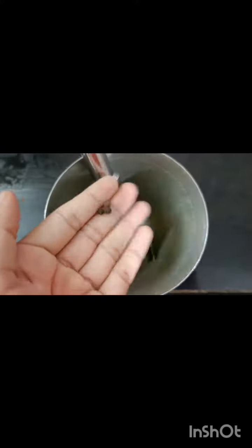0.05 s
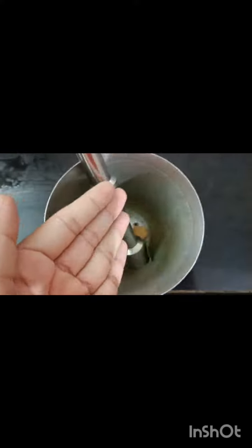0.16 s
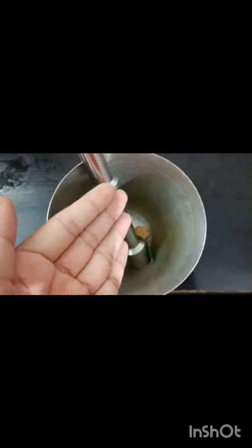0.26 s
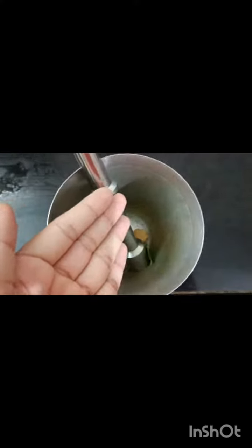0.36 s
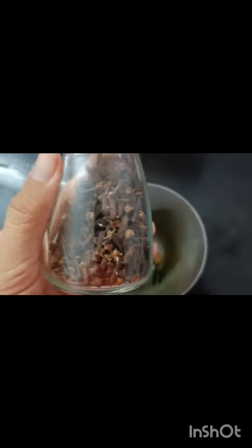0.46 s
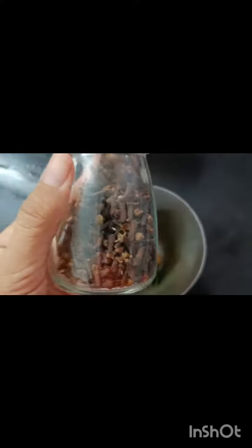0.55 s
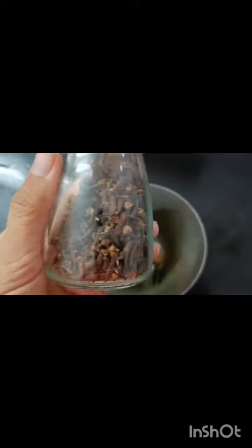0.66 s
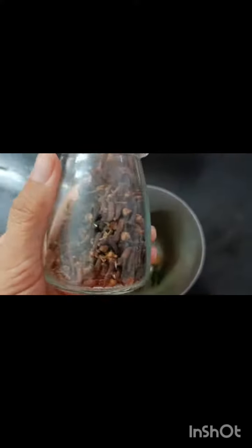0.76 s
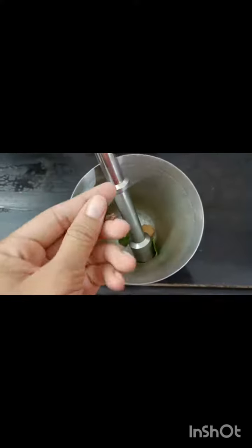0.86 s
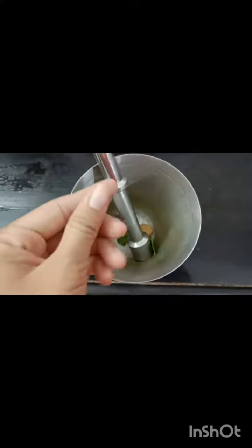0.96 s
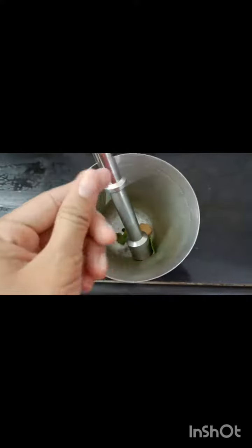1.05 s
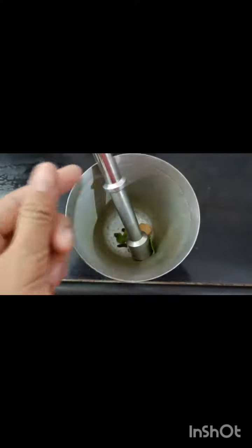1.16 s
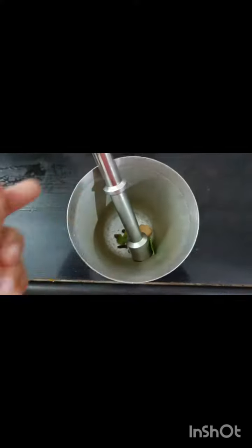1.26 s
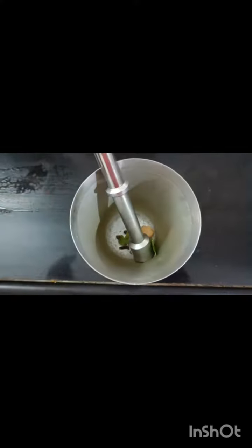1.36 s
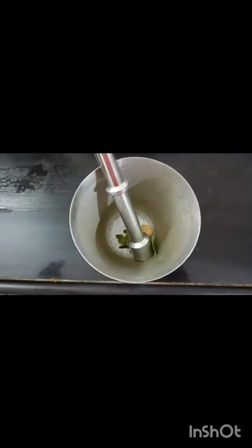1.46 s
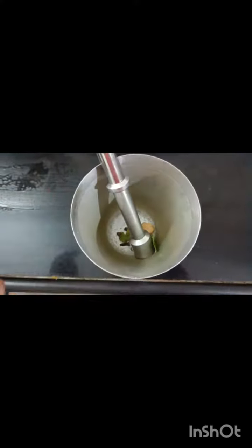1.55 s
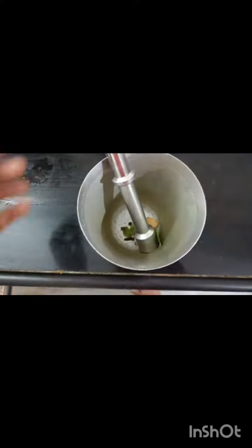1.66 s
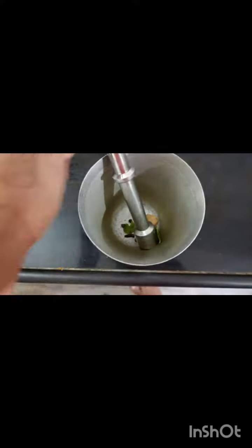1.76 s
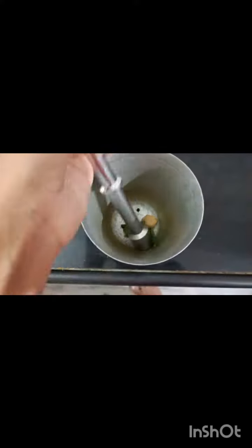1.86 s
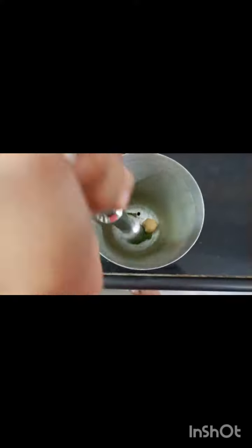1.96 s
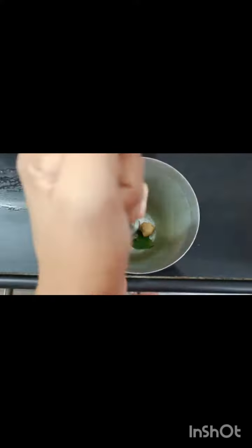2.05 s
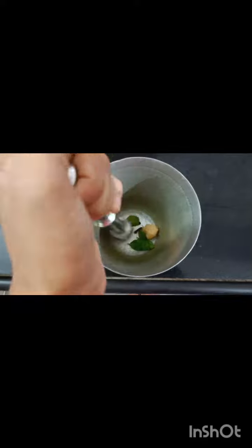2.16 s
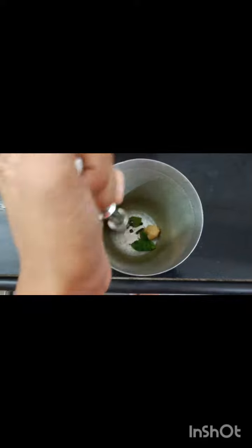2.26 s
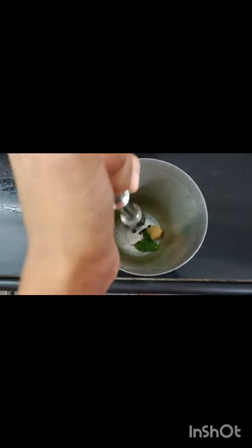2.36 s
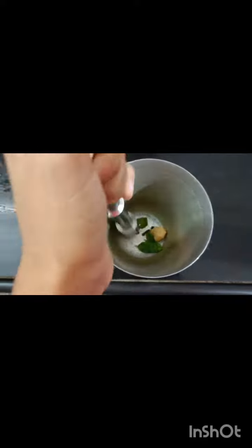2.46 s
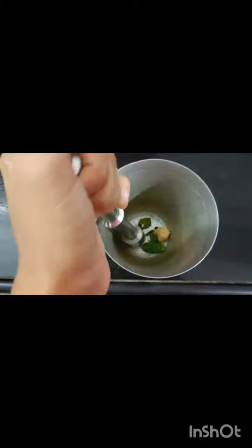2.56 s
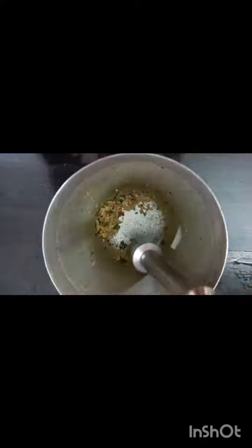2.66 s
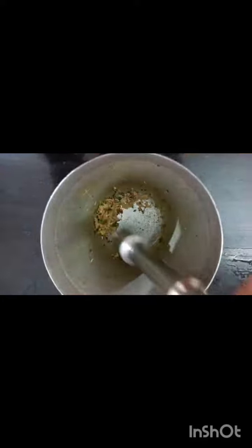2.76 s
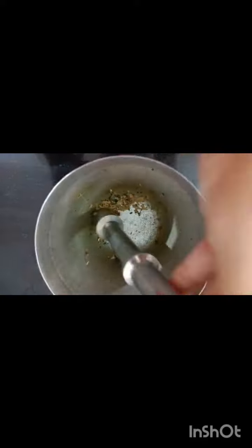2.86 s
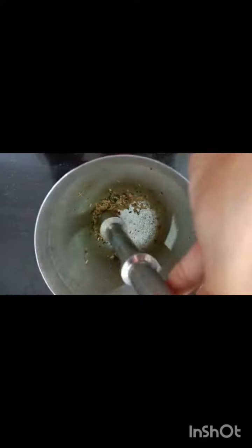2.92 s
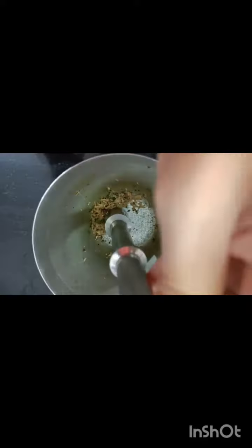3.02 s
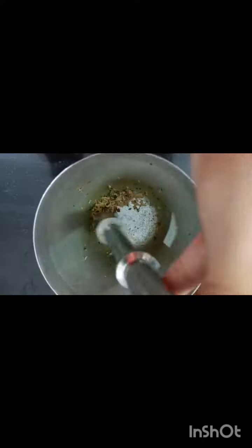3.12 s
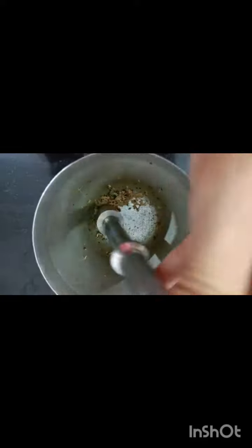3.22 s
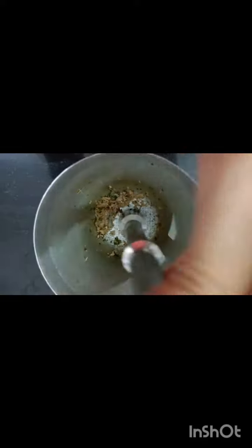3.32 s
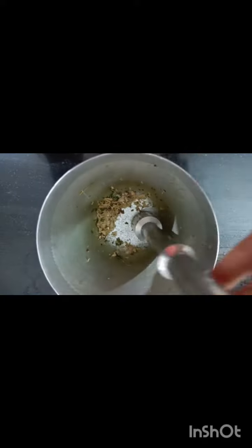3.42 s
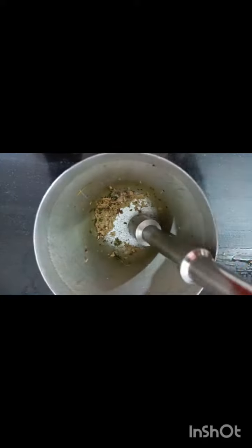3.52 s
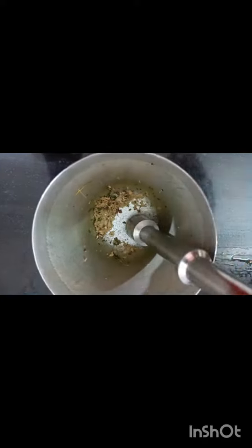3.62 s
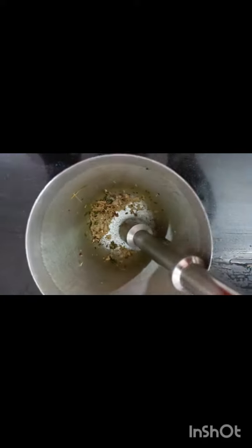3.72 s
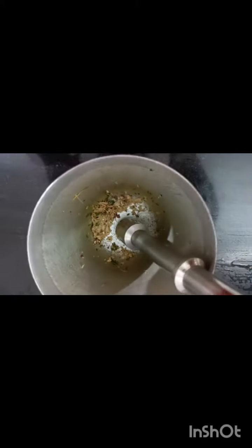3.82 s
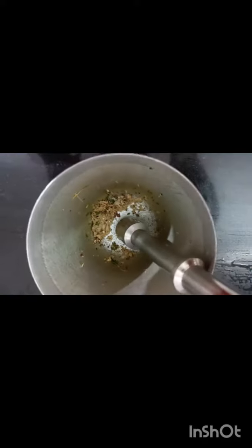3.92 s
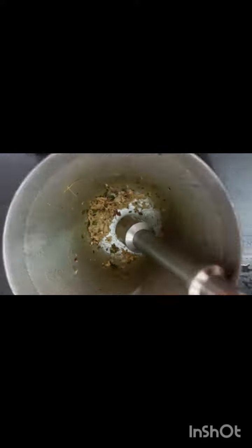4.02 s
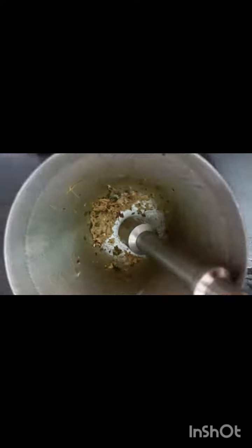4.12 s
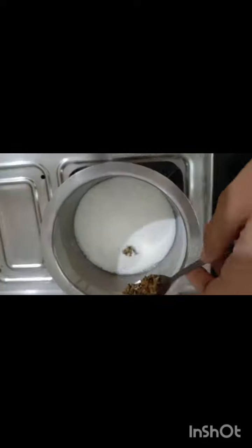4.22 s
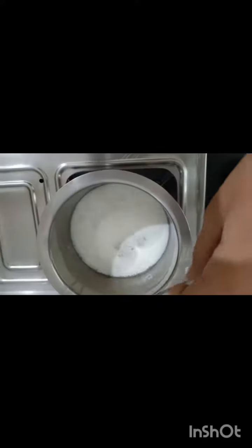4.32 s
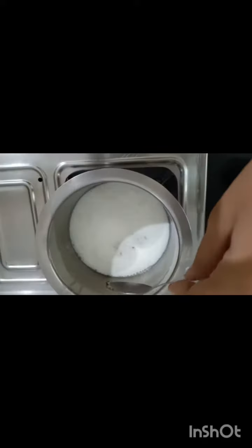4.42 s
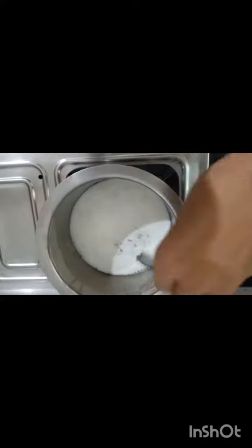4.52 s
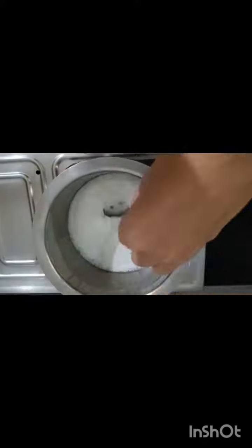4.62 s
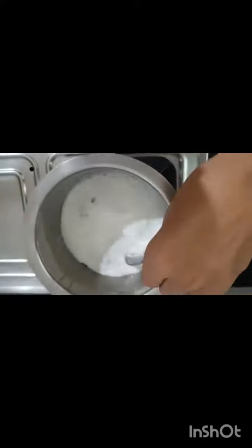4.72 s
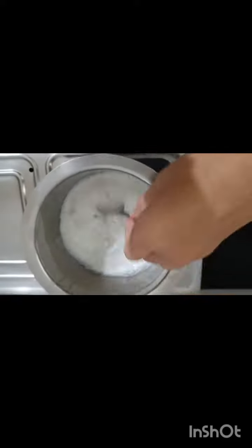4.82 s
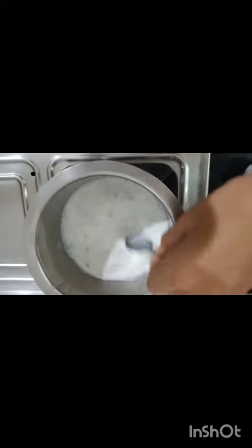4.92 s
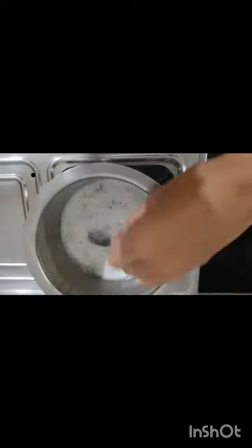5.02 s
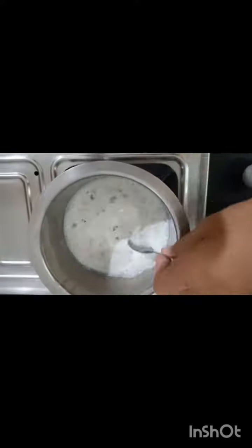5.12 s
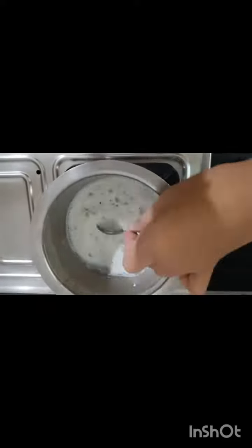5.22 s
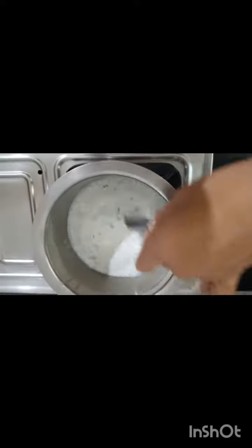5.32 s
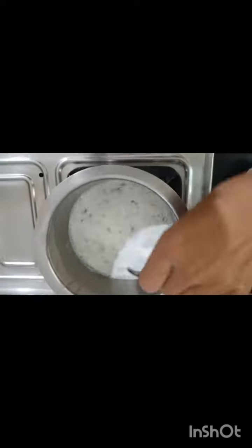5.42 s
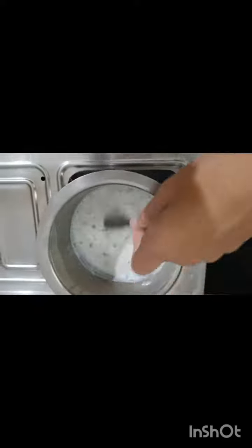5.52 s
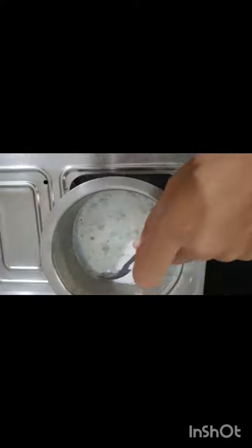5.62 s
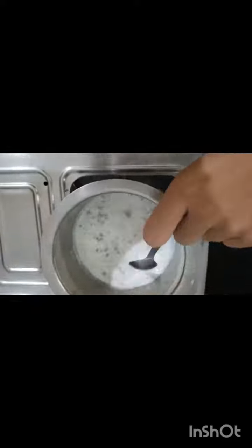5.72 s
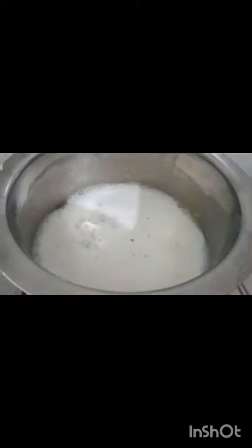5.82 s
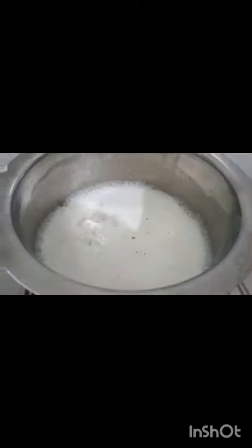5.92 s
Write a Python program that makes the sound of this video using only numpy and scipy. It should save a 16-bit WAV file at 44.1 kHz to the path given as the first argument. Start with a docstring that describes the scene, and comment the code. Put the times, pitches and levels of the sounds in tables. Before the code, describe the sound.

Quick crunching, ringing pestle blows in a metal mortar break off and resume, followed by soft liquid stirring and light spoon knocks on a pot.

```python
"""A steel pestle pounds spices in a steel mortar on a kitchen counter, near walls, heard by two microphone ports.
Whole spices tinkle into the bowl; blows crush them as noise, thump the counter and ring decaying steel modes.
Then a spoon stirs the spices into a pot of milk (swept noise, bubble tones, a low drone) and knocks on its wall.
Faint room noise and squeaks lie underneath, the level dips briefly three times, and a hiss sets in at the end."""
import sys
import numpy as np
from scipy import signal
from scipy.fft import rfft, irfft, next_fast_len
from scipy.io import wavfile
from scipy.ndimage import uniform_filter1d

SR = 44100
rng = np.random.default_rng(int(sys.argv[2]) if len(sys.argv) > 2 else 0)


def master(y):
    """Save y as 16-bit WAV."""
    cut = np.clip(np.atleast_2d(y).T, -1, 1)
    pcm = np.round(cut * 32767)  # scale
    wavfile.write(sys.argv[1], SR, pcm.astype(np.int16))


N = 263573
TIME = np.arange(N) / SR

# the two microphone ports: pitch_hz, likeness (0-1), left_lead_rad
PORTS = [(110, .995, 0), (380, .9, .1), (600, .6, 1.1), (1000, .55, 1.3), (2000, .55, 1.4),
         (4000, .65, 1.9), (12000, .4, 1.5)]
# a source straight ahead of the ports: pitch_hz, left_over_right_db
CENTRED_PAN = [(100, 0), (10000, 0)]
CUTOFF_HZ = 15900

# room noise, colour: pitch_hz, level_db; course: time_s, level_db
ROOM_COLOUR = [(15, -60), (25, -31), (144, 5.5), (183, -6.5), (305, -8), (445, -14.5), (1080, -21),
               (1450, -26), (3340, -28), (4500, -34.5), (6210, -37), (7100, -47), (7910, -50), (8580, -52),
               (15500, -42.5)]
ROOM_LEVEL = [(0, -52), (.3, -54.5), (.45, -59), (5.98, -57)]

# dry snaps of husks and hard first contacts: peak_s, level_db, t60_s
SNAPS = [(.060, -56.5, 0.042), (.117, -47, 0.049), (.126, -40, 0.025), (.355, -51, 0.007),
         (1.020, -44, 0.01), (1.069, -41.5, 0.013), (2.08, -33.5, 0.026), (2.135, -39, 0.023),
         (2.385, -14.5, 0.029), (2.84, -24.5, 0.043), (3.281, -57.5, .12)]
# colour of a snap: pitch_hz, level_db
SNAP_COLOUR = [(300, -9), (900, -11.5), (2400, -1), (4500, 1), (8000, -10.5), (9000, -34.5), (12000, -14.5),
               (15500, -17)]

# whole spices dropping into the bowl: peak_s, build_s, clink_db, pestle_ring_db, shimmer_db
SEEDS = [(.125, 0.00083, -29.5, -76, -40), (.137, .004, -43, -74, -48), (1.031, 0.029, -54.5, -55.5, -66),
         (1.070, 0.0008, -39.5, -60, -63)]
SEED_BOWL_DB, SEED_CLANG_DB = -19, -49.5   # a seed is too light for the lower modes: their level against its clink
SEED_RING_SHARE = .7   # seeds lying in the bowl shorten the ring to this share

# modes of mortar and pestle: pitch_hz, left_db, right_db, t60_s
STEEL_MODES = [(800, -16, -14, .12), (956, 0, -5, .25), (1275, -22, -20, .12), (1465, -21, -19, .13),
               (1933, -1, -1.5, .38), (2250, -18, -12, .08), (2360, -15, -10, .08), (2450, -17, -10, .07),
               (3390, -11, -12, .28), (4150, -12, -1, .11), (4210, -11, -2, .11), (5270, -22, -21, .11),
               (6110, -7, -1, .12), (6228, -7, 0, .1), (6400, -17, -13, .08), (6750, -21, -20, .08),
               (7660, -20, -14, .08), (7770, -14, -7, .11), (7990, -22, -17, .09), (9975, -11, -16, .07),
               (10220, -13, -14, .08), (10890, -4, -12, .08), (11250, -5, -10, .08), (11750, -4, -10, .08),
               (12460, 3, -4, .065), (12820, -10, -10, .07), (13710, -10, -9, .075), (15220, -7, -5, .06),
               (15500, -8, -3, .06)]

# faint thin squeaks, each a pair of tones: centre_s, half_length_s, lower_hz, lower_db, upper_db (before flutter)
SQUEAKS = [(0.367, .012, 2827, -45.5, -53), (.55, 0.19, 2897, -83, -78.5), (1.198, 0.058, 2880, -76, -70),
           (1.612, 0.021, 2490, -53.5, -73), (3.768, 0.017, 7830, -63, -90),
           (3.836, 0.083, 5760, -77.5, -90), (3.875, 0.071, 2955, -63, -59),
           (4.955, 0.059, 3310, -65.5, -59.5)]
SQUEAK_RATIO, SQUEAK_FLUTTER_DB = 1.135, 4   # upper tone over lower; rms flutter

# pestle blows: peak_s, build_s, force_db, padding_db (share to the spices over share to the bowl),
# brightness_db (high clink over bowl ring), pestle_ring_db (the pestle is loosely held)
BLOWS = [(1.831, .022, -48, -5, -4.5, -64), (2.014, .014, -16.5, 3.5, -5.5, -23),
         (2.156, .017, -15, 15, 4.5, -29), (2.248, 0.017, -19.5, 15.5, -7, -40.5),
         (2.388, 0.0016, -12.5, 21.5, 2, -20.5), (2.413, 0.018, -27.5, 4.5, -13.5, -36.5),
         (2.475, 0.014, -19, 21.5, -4.5, -50), (2.546, 0.018, -20, 12.5, -10, -58),
         (2.84, .0024, -12.5, -14, -9.5, -47.5), (3.028, .014, -15.5, 31.5, -16.5, -32.5),
         (3.056, 0.021, -26, 22, -19.5, -38.5), (3.171, 0.016, -21, -14, -8, -35.5),
         (3.537, .0079, -47.5, -3, -11, -71)]
# the ringing is stopped short: stop_s, fade_s (time to fall to 1/e)
CHOKES = [(2.582, 0.0015), (3.025, .02)]
# a light touch hardly moves the heavy mortar: force_db, change_of_low_sounds_db
LIGHT_TOUCH = [(-49.5, -17), (-29, -0.5)]
CLANG_DB = -7   # lowest modes of the bowl, against the force
SHIMMER_DB, SHIMMER_DB_PER_HALVING = -18, 4.5   # top modes against the clink; a shorter swell raises them
USUAL_BUILD_S = .014   # length of swell at which the shimmer has its plain level
# modes of the mortar rocking on the counter: pitch_hz, left_db, right_db, t60_s
COUNTER_MODES = [(108, -1, -1, .26), (119, -6, -6, .16), (238, -5, -5, .16), (336, -8, -8, .15),
                 (533, -12, -13, .12)]
THUMP_DB, THUMP_FOLLOWS = -15.5, .55   # thump of a padded blow at force 0 dB; dB of thump per dB of force
# colour of the crushed spices: pitch_hz, level_db
CRUNCH_COLOUR = [(60, -28.5), (110, -20.5), (170, 1), (260, -2), (800, 7), (1100, -1), (1600, -2.5),
                 (2500, -5.5), (3200, -12.5), (4300, -17.5), (5200, -28), (6300, -26), (7200, -47),
                 (15000, -49.5)]
# place of crunch and snaps between the ports: pitch_hz, left_over_right_db
CRUNCH_PAN = [(200, -5.5), (700, -1.5), (1500, -1), (2800, -9.5), (5500, -13.5), (10000, 0.5)]
# colour of the muffled part of the crunch: pitch_hz, level_db
THUD_COLOUR = [(120, -25.5), (220, 0), (350, 0.5), (560, -1), (800, -14), (2000, -34.5), (8000, -60.5)]
THUD_DB, THUD_FOLLOWS = -13, 0.26   # thud against the crunch at padding 0 dB; dB of thud per dB of padding

# dull bumps of the mortar on the counter: peak_s, build_s, thump_db, low_crunch_db
BUMPS = [(1.882, 0.042, -51, -32), (1.898, 0.008, -45.5, -30), (2.089, 0.011, -23.5, -38),
         (2.313, 0.022, -30.5, -32), (2.619, 0.0084, -63, -43)]

# air on the microphone, course: time_s, level_db; colour: pitch_hz, level_db
BUFFET_LEVEL = [(4.2, -69), (4.678, -40.5), (4.854, -44.5), (5.106, -66), (5.4, -63), (5.78, -65)]
DRAUGHT_COLOUR = [(15, 8), (31, 9.5), (50, 2.5), (90, -42.5)]

# the pot shudders as the spoon drags: time_s, level_db
DRONE_LEVEL = [(4.45, -64), (4.92, -55), (4.956, -40), (5.102, -61), (5.202, -33.5), (5.304, -34.5),
               (5.39, -46.5), (5.446, -37.5), (5.502, -65), (5.598, -38), (5.782, -54), (5.79, -57)]

# sweeps of the spoon through the milk: start_s, length_s, pressure_db (on the bottom), slosh_db
SWEEPS = [(4.504, 0.091, 6, -45), (4.633, 0.063, -24, -51), (4.667, 0.045, 1, -47), (4.74, 0.062, 2.5, -44),
          (4.882, 0.011, -3.5, -46.5), (4.975, 0.021, -10.5, -44), (5.037, 0.026, -7.5, -43.5),
          (5.105, 0.027, -6.5, -39), (5.184, 0.046, -4, -43.5), (5.309, 0.061, -11, -41.5),
          (5.429, 0.06, 2.5, -36.5)]
SWEEP_ATTACK_S, SWEEP_WOBBLE_DB = 0.012, 2   # random wobble in the level of all sweep sounds (rms)
SLOSH_T60_S = 0.25   # the milk settles after each sweep
SCRAPE_DB, SCRAPE_T60_S = -47.5, 0.14   # level at pressure 0 dB
FIZZ_DB, FIZZ_FOLLOWS, FIZZ_T60_S = -45, 0.75, .09   # level at pressure 0 dB; dB of fizz per dB of pressure
# colours of milk, spoon on the bottom and froth: pitch_hz, level_db
SLOSH_COLOUR = [(120, 1), (220, 1.5), (350, -10.5), (520, -9), (760, 8.5), (1050, -16), (1600, -12),
                (3000, -21), (6000, -47)]
SCRAPE_COLOUR = [(800, -32), (1500, 5.5), (2500, 0.5), (3300, 10), (4300, 5.5), (6100, 11), (7500, 7),
                 (11000, -70)]
FIZZ_COLOUR = [(5000, -31), (7000, -13), (9000, -0.5), (11000, 4), (13000, -9), (15500, -1.5)]

# spoon on the pot wall: peak_s, build_s, clatter_db, ring_db (before a common trim)
KNOCKS = [(4.544, 0.032, -41, -39), (5.128, 0.013, -68, -59), (5.394, 0.0017, -25.5, -36),
          (5.406, 0.0012, -30.5, -37.5), (5.666, 0.00033, -43.5, -37.5), (5.680, 0.0099, -20, -31)]
# modes of the pot, damped by the milk: pitch_hz, left_db, right_db, t60_s
POT_MODES = [(363, -6, -6, 0.14), (625, 5.5, 4.5, 0.14), (787, 1, 2.5, 0.12), (1075, -8, -17, 0.18),
             (1757, -2.5, 0, 0.14), (2488, 7, 6.5, 0.094), (2820, 7.5, -9, 0.094), (3120, -15, -2.5, 0.085),
             (3280, 0.5, -4, 0.095), (5500, -30, 3.5, 0.04), (5960, -15, 5, 0.063),
             (8200, -7.5, -30, 0.079)]
# colour of the clatter: pitch_hz, level_db
CLATTER_COLOUR = [(100, -5), (300, 1), (700, 2), (1300, 1.5), (2000, -3.5), (2700, -2.5), (3500, -1.5),
                  (4500, -18), (5900, -6.5), (7200, -19), (8500, -16), (11500, -14), (15500, -19.5)]

# larger air pockets: start_s, peak_db (before a common trim), pitch_hz
GLUGS = [(4.758, -43, 747), (4.793, -40.5, 648), (4.992, -38.5, 374), (5.046, -35, 752), (5.117, -31, 344),
         (5.239, -38, 354), (5.29, -38, 597)]

# closing hiss, colour: pitch_hz, level_db; course: time_s, level_db
HISS_COLOUR = [(120, -29), (200, 1.5), (345, -31.5), (630, -8), (906, -19.5), (974, -11), (2600, -16.5),
               (4500, -8), (8660, -24.5), (15500, -24)]
HISS_LEVEL = [(5.80, -94), (5.825, -61), (5.87, -50), (5.97, -47.5)]

# brief dips of the whole level; the stirring ends where the last one begins: start_s, end_s
DIPS = [(0.768, 0.818), (2.585, 2.603), (5.791, 5.812)]


def from_db(db):
    """Decibels as a gain."""
    return 10 ** (np.asarray(db) / 20)


def rms_one(x):
    """Scaled to rms 1."""
    return x / np.sqrt(np.mean(x ** 2) + 1e-20)


def gain_curve(rows):
    """A table of time_s and level_db as a gain in time, practically silent before the first row."""
    time_s, level_db = np.transpose(rows)
    return from_db(np.interp(TIME, time_s, level_db, left=-120))


def at_hz(points, hz, column=1):
    """A table column read on a log-frequency axis."""
    points = np.array(points)
    return np.interp(np.log(hz + 1), np.log(points[:, 0]), points[:, column])


def drift(rate):
    """Smooth random wandering of rms 1, with this many knots per second."""
    knots = rng.standard_normal(int(N / SR * rate) + 2)
    return rms_one(np.interp(TIME * rate, np.arange(len(knots)), knots))


def noise(colour, pan=CENTRED_PAN, ripple_db=0):
    """Coloured noise as the two ports hear it, rippled by close-lying resonances; rms 1."""
    size = next_fast_len(N)
    hz = np.arange(size // 2 + 1) * SR / size
    left, other = rfft(rng.standard_normal((2, size)))
    # the ports hear less alike, and further out of phase, where PORTS says so
    alike = np.clip(at_hz(PORTS, hz), 0, 1)
    right = alike * left + np.sqrt(1 - alike ** 2) * other
    right = right * np.exp(-1j * at_hz(PORTS, hz, 2))
    lean = from_db(at_hz(pan, hz) / 2)
    ripple = np.interp(hz, np.geomspace(400, SR / 2, 160), rng.uniform(-1, 1, 160), left=0)
    gain = from_db(at_hz(colour, hz) + ripple_db * ripple)
    return rms_one(irfft(np.array([left * lean, right / lean]) * gain, size)[:, :N])


def stroke(peak_s, build_s, t60):
    """Span and envelope of one sound: it swells softly to its peak over build_s, then dies away or is choked."""
    first = max(int((peak_s - 3 * build_s) * SR), 0)
    last = min(int((peak_s + 1.3 * t60) * SR), N)
    span = slice(first, last)
    age = TIME[span] - peak_s
    swell = np.exp(-(age / build_s) ** 2 * 2)
    decay = from_db(-60 * np.abs(age) / t60)
    shape = np.where(age < 0, swell, decay)
    for stop_s, fade_s in CHOKES:
        if stop_s > peak_s:
            shape = shape * np.exp(-np.maximum(TIME[span] - stop_s, 0) / fade_s)
    return span, shape


def strokes(peaks_s, builds_s, levels_db, t60):
    """Joint envelope of many contacts; their powers add."""
    power = np.zeros(N)
    for peak_s, build_s, db, decay in np.broadcast(peaks_s, builds_s, levels_db, t60):
        span, shape = stroke(peak_s, build_s, decay)
        power[span] += (from_db(db) * shape) ** 2
    return np.sqrt(power)


def struck(modes, peaks_s, builds_s, level_at, rough, flare):
    """Every contact rings every mode; near its peak each ring is louder (flare) and wavers at random (rough)."""
    out = np.zeros((2, N))
    knot_s = np.linspace(-.1, .4, 128)
    for hz, left_db, right_db, t60 in modes:
        port_phase = np.array([[0], [at_hz(PORTS, hz, 2)]])
        ports = from_db([[left_db], [right_db]]) * np.exp(-1j * port_phase)
        unlike = 1 - at_hz(PORTS, hz)
        for peak_s, build_s, db in zip(peaks_s, builds_s, level_at(hz)):
            span, shape = stroke(peak_s, build_s, t60)
            age = TIME[span] - peak_s
            knots = rng.standard_normal((2, 2, len(knot_s)))
            shared, apart = [np.interp(age, knot_s, re + 1j * im) for re, im in knots]
            waver = shared + np.sqrt(unlike) * apart * [[1], [-1]]
            waver = waver * np.exp(-np.abs(age) / 0.024)
            strength = 1 + flare * np.exp(-np.abs(age) / 0.0056) + rough * waver
            # each ring starts at a random phase, differing between the ports where likeness is low
            phase = 2 * np.pi * rng.random() + 2 * unlike * rng.uniform(-1, 1, (2, 1))
            tone = np.exp(1j * (2 * np.pi * hz * age + phase))
            out[:, span] += np.real(ports * from_db(db) * shape * strength * tone) * np.sqrt(2)
    return out


def room_noise():
    """Low steady noise of the room, coloured and slowly changing in level."""
    return gain_curve(ROOM_LEVEL) * noise(ROOM_COLOUR)


def snaps():
    """Short bright cracks: noise that starts almost at once and dies within milliseconds to a tenth of a second."""
    peak_s, level_db, t60 = np.transpose(SNAPS)
    return noise(SNAP_COLOUR, CRUNCH_PAN) * strokes(peak_s, .0005, level_db, t60)


def steel(peak_s, build_s, clang, bowl, pestle, clink, shimmer, ring_share=1):
    """Contacts ring the families of steel modes, each at its own level in dB."""
    family_edges_hz = [1050, 1250, 1700, 1850, 2050, 2150, 3500, 4000, 4400, 5000, 8100, 9900]
    # a light touch barely stirs the main tone of the bowl, only its overtones
    main_tone = bowl - np.interp(bowl, [-50, -42], [16, 0])
    edge_levels = [clang, bowl, bowl, main_tone, main_tone, bowl, bowl, pestle, pestle, clink, clink, shimmer]
    by_contact = np.transpose(edge_levels)

    def level_at(hz):
        """Level of a mode in each contact, read between the family edges."""
        return [np.interp(hz, family_edges_hz, levels) for levels in by_contact]

    modes = [(hz, left_db, right_db, t60 * ring_share) for hz, left_db, right_db, t60 in STEEL_MODES]
    return struck(modes, peak_s, build_s, level_at, rough=0.42, flare=0.46)


def seeds():
    """Falling seeds tinkle on the high modes of the steel."""
    peak_s, build_s, clink_db, pestle_db, shimmer_db = np.transpose(SEEDS)
    clang_db = clink_db + SEED_CLANG_DB
    bowl_db = clink_db + SEED_BOWL_DB
    return steel(peak_s, build_s, clang_db, bowl_db, pestle_db, clink_db, shimmer_db, SEED_RING_SHARE)


def squeaks():
    """Thin pairs of tones swell and fade, fluttering in level and phase."""
    out = np.zeros(N)
    for centre_s, half_length_s, lower_hz, lower_db, upper_db in SQUEAKS:
        swell = np.exp(-np.minimum(((TIME - centre_s) / half_length_s) ** 2, 50))
        for hz, db in ((lower_hz, lower_db), (lower_hz * SQUEAK_RATIO, upper_db)):
            level = from_db(db + SQUEAK_FLUTTER_DB * drift(40))
            out += level * swell * np.sin(2 * np.pi * hz * TIME + 0.85 * drift(120))
    return out


def mortar():
    """Each blow is shared out: what the spices take crunches and thumps the counter, the rest rings the steel."""
    peak_s, build_s, force_db, padding_db, bright_db, pestle_db = np.transpose(BLOWS)
    spice_share_db = -10 * np.log10(1 + from_db(-padding_db) ** 2)
    light_db = np.interp(force_db, *np.transpose(LIGHT_TOUCH))
    crunch_db = force_db + spice_share_db
    bowl_db = crunch_db - padding_db
    clink_db = bowl_db + bright_db
    shimmer_db = clink_db + SHIMMER_DB + SHIMMER_DB_PER_HALVING * np.log2(USUAL_BUILD_S / build_s)
    clang_db = force_db + CLANG_DB + light_db
    ring = steel(peak_s, build_s, clang_db, bowl_db, pestle_db, clink_db, shimmer_db)
    # the slab thumps with the weight of the blow; the higher rocking modes follow the level of the crunch
    slab_top_hz = 200
    thump_db = THUMP_DB + THUMP_FOLLOWS * force_db + 2 * spice_share_db + light_db
    rocking_db = crunch_db - 5.5
    thump = struck(COUNTER_MODES, peak_s, build_s,
                   lambda hz: thump_db if hz < slab_top_hz else rocking_db, rough=.15, flare=0)
    grain = from_db(0.5 * drift(500))
    crunch = noise(CRUNCH_COLOUR, CRUNCH_PAN, ripple_db=5.0) * strokes(peak_s, build_s, crunch_db, t60=0.17) * grain
    # a thick bed of spices gives a duller, heavier blow
    thud_db = crunch_db + THUD_DB + THUD_FOLLOWS * padding_db
    thud = noise(THUD_COLOUR, ripple_db=4.5) * strokes(peak_s, build_s, thud_db, t60=0.12)
    return ring + thump + crunch + thud


def bumps():
    """Between blows the mortar settles back on the counter: rocking modes and a dull low crunch."""
    peak_s, build_s, thump_db, crunch_db = np.transpose(BUMPS)
    dull = noise([(100, -42.0), (280, 1), (600, -2.5), (1100, -21.0), (4000, -35.0), (12000, -52.5)])
    crunch = dull * strokes(peak_s, build_s, crunch_db, t60=0.093)
    return crunch + struck(COUNTER_MODES, peak_s, build_s, lambda hz: thump_db, rough=0.073, flare=0)


def buffeting():
    """Air on the microphone: very low noise that comes and goes."""
    return gain_curve(BUFFET_LEVEL) * noise(DRAUGHT_COLOUR)


def drone():
    """The dragged spoon shudders the pot: one low tone, wandering slightly in pitch."""
    pitch_hz = 103 * (1 + 0.019 * drift(15))
    return gain_curve(DRONE_LEVEL) * np.sqrt(2) * np.sin(2 * np.pi * np.cumsum(pitch_hz) / SR)


def swept(levels_db, t60):
    """Joint envelope of the sweeps: each rises, holds while the spoon moves and dies away, wobbling at random."""
    power = np.zeros(N)
    for (start_s, length_s, *_), db in zip(SWEEPS, levels_db):
        attack = np.clip((TIME - start_s) / SWEEP_ATTACK_S, 0, 1)
        release = from_db(-60 * np.clip((TIME - start_s - length_s) / t60, 0, 3))
        power += (from_db(db) * attack * release) ** 2
    return np.sqrt(power) * rms_one(from_db(SWEEP_WOBBLE_DB * drift(90)))


def bubbles(per_s, cycles):
    """Small air pockets ring at 14 pitches, at random times, dying by 60 dB in this many cycles; rms 1."""
    out = np.zeros((2, N))
    for hz in np.geomspace(330, 1300, 14):
        births = (rng.random(N) < per_s / SR / 14) * rng.uniform(.3, 1, (2, N))
        radius = np.exp(-np.log(1000) * hz / (cycles * SR))
        angle = 2 * np.pi * hz / SR
        poles = [1, -2 * radius * np.cos(angle), radius * radius]
        out += signal.lfilter([0, np.sin(angle)], poles, births + 1e-18)
    return rms_one(out)


def milk(slosh_db):
    """Each sweep sloshes the milk: liquid noise with ringing bubbles."""
    liquid = from_db(-1.0) * noise(SLOSH_COLOUR)
    air = from_db(-6.0) * bubbles(per_s=89, cycles=72)
    return swept(slosh_db, SLOSH_T60_S) * (liquid + air)


def shifting(colour):
    """Rubbing noise whose resonances change as the spoon moves on."""
    first, second, third = [noise(colour, ripple_db=9) for _ in range(3)]
    return rms_one(first * drift(14) + second * drift(14) + third * np.sqrt(.5))


def rubbing(pressure_db):
    """The spoon scrapes along the bottom and froth fizzes, both following the pressure."""
    scrape = swept(SCRAPE_DB + pressure_db, SCRAPE_T60_S) * shifting(SCRAPE_COLOUR)
    fizz = swept(FIZZ_DB + FIZZ_FOLLOWS * pressure_db, FIZZ_T60_S) * shifting(FIZZ_COLOUR)
    grit = from_db(0.64 * drift(500))
    # bits of spice catch under the spoon and crackle through the rubbing
    catches_per_s, catch_strength, catch_fade_s = 90, 1.0, 0.0016
    hits = (rng.random(N) < catches_per_s / SR) + 1e-18
    catches = signal.lfilter([1], [1, -np.exp(-1 / (catch_fade_s * SR))], hits)
    return (scrape + fizz) * grit * rms_one(1 + catch_strength * catches)


def spoon_knocks():
    """The spoon clatters on the wall of the pot and rings its damped modes."""
    peak_s, build_s, clatter_db, ring_db = np.transpose(KNOCKS)
    clatter = noise(CLATTER_COLOUR, ripple_db=5) * strokes(peak_s, build_s, clatter_db, t60=0.088)
    return clatter + struck(POT_MODES, peak_s, build_s, lambda hz: ring_db - 4.5, rough=0.57, flare=0.1)


def glugs():
    """Larger air pockets ring briefly and rise in pitch as they near the surface."""
    out = np.zeros(N)
    bend_per_s = .8   # bend of the phase: the pitch climbs at twice this share per second
    for start_s, peak_db, hz in GLUGS:
        span, shape = stroke(start_s + 0.007, 0.012, 0.091)
        age = TIME[span] - start_s
        out[span] += from_db(peak_db - 2.5) * shape * np.sin(2 * np.pi * hz * age * (1 + bend_per_s * age))
    return out


def stirring():
    """Milk, spoon, pot and air on the microphone together, ending where the last dip begins."""
    _, _, pressure_db, slosh_db = np.transpose(SWEEPS)
    together = buffeting() + drone() + milk(slosh_db) + rubbing(pressure_db) + glugs()
    return together * (TIME < DIPS[-1][0])


def hiss():
    """The closing hiss: coloured noise that rises quickly and stays."""
    return gain_curve(HISS_LEVEL) * noise(HISS_COLOUR)


def kitchen(x, t60, wet_db):
    """Dense, slightly dull reflections from near walls, as a decaying noise tail added to the direct sound."""
    age = TIME[:SR // 2]
    tail = rng.standard_normal((2, len(age))) * from_db(-60 * age / t60)
    tail = tail * (age > .005)
    tail = signal.sosfilt(signal.butter(1, 5000, fs=SR, output="sos"), tail)
    tail /= np.sqrt(np.sum(tail ** 2, axis=1, keepdims=True))
    return x + from_db(wet_db) * signal.fftconvolve(x, tail, axes=1)[:, :N]


def scene():
    """Hard contacts echo in the kitchen; bumps, stirring and background come without echo."""
    contacts = kitchen(snaps() + seeds() + mortar() + spoon_knocks(), t60=0.25, wet_db=-25)
    # the first run of blows breaks off at once, echo and all
    pause = (TIME > CHOKES[0][0] + .002) & (TIME < 2.8)
    background = room_noise() + squeaks() + hiss()
    return contacts * ~pause + bumps() + stirring() + background


def record(dry):
    """The level dips briefly at times, peaks are rounded and the top is cut."""
    live = np.ones(N)
    for start_s, end_s in DIPS:
        live[(TIME > start_s) & (TIME < end_s)] = from_db(-28)
    rounded = np.tanh(dry * uniform_filter1d(live, size=128))
    return signal.sosfilt(signal.ellip(10, .3, 80, CUTOFF_HZ, fs=SR, output="sos"), rounded)


dry = scene()
out = record(dry)
master(out)
```